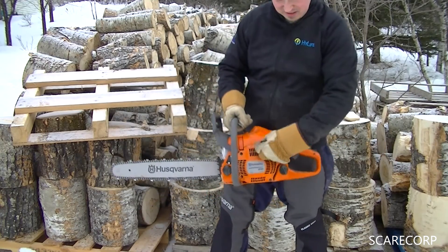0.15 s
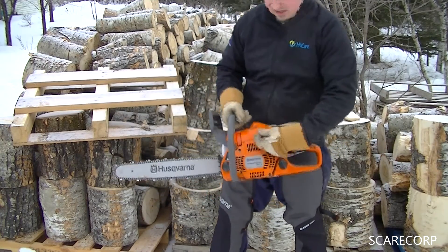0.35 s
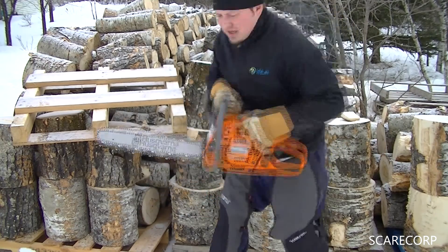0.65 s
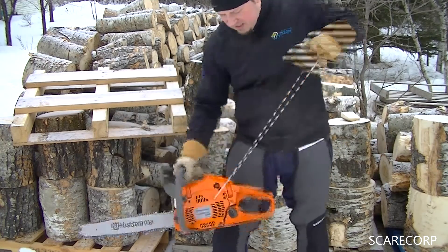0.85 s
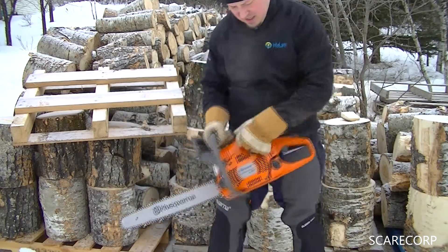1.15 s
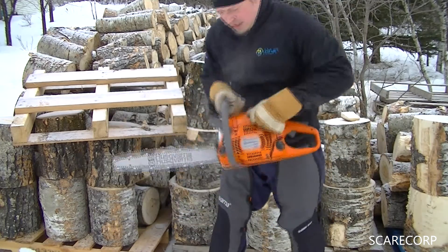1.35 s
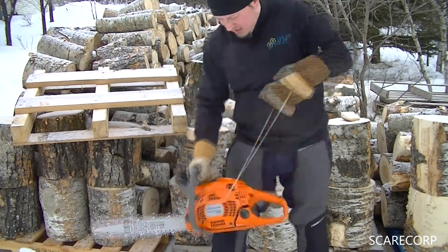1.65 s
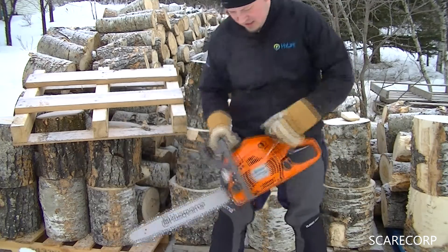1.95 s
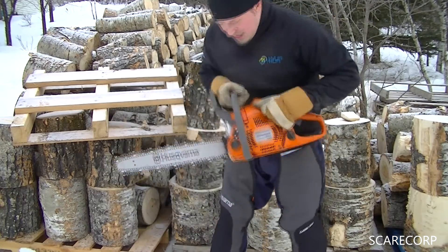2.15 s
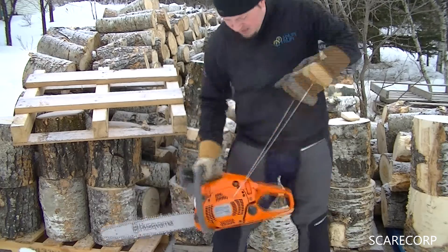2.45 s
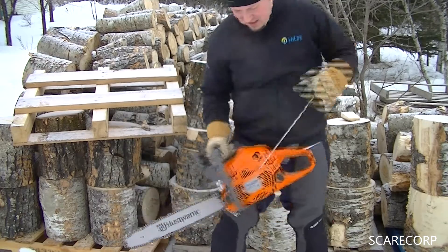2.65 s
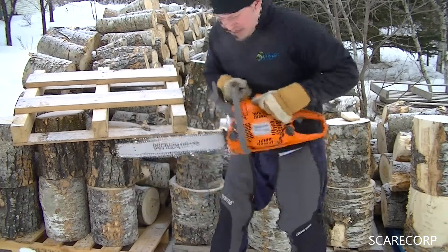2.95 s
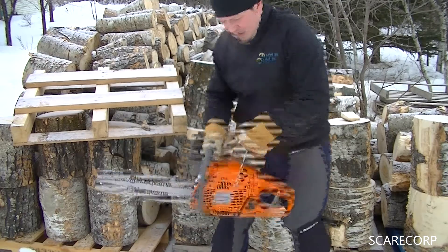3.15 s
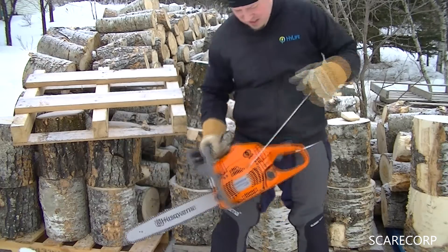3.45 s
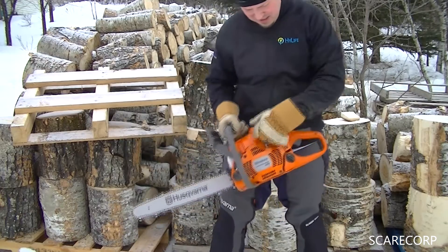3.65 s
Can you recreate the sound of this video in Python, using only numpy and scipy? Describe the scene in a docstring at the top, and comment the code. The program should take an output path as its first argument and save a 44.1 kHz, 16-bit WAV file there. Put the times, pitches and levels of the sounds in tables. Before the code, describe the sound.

Chainsaw pull-starter yanked four times outdoors, engine chuffing over briefly but never firing

```python
"""Outdoors by a woodpile, a cold two-stroke chainsaw is pulled over four times by its rope starter and never fires.
Each pull: a sleeve of filtered friction swishes, the pawls catch with a clack of noise and short rings,
the rope rasps out and the piston chuffs in gliding sine pulses, speeding up and then coasting.
The housing knocks and rattles in short resonances; the rope winds back over ticking pawls that ring the steel,
and the handle bumps the case. Short echoes and a soft filtered-noise rush lie behind."""
import sys
import numpy as np
from scipy import signal
from scipy.fft import rfft, irfft
from scipy.io import wavfile

SR = 44100
rng = np.random.default_rng(int(sys.argv[2]) if len(sys.argv) > 2 else 0)


def digitize_waveform(pressure):
    """Quantize a signal to 16-bit integers and store it at the path in sys.argv[1].

    Rows of a 2-D input are taken as channels; values are limited to [-1, 1].
    """
    field = np.atleast_2d(pressure).T
    bounded = np.clip(field, -1, 1)
    quanta = np.round(bounded * 32767).astype(np.int16)
    wavfile.write(sys.argv[1], SR, quanta)


N = 167580
TIME = np.arange(N) / SR


def crank(first, out, start_rps, top_rps, coast_s):
    """Crankshaft speed and turns since the first chuff: driven up by the rope, then coasting down."""
    driven = np.interp(TIME, [first, out], [start_rps, top_rps])
    speed = driven * np.exp(-np.maximum(TIME - out, 0) / coast_s)
    turns = np.cumsum(speed) / SR
    return speed, turns - np.interp(first, TIME, turns)


CHUFF_GLIDE, CHUFF_SHAPE = 1.77, 3.75  # pitch glide in times to peak; exponent that narrows the swell
CHUFF_SCATTER = 0.015  # random share of pitch


def chuff(partial, length):
    """A gulp of air through the port: a quick swell whose pitch rises as it dies."""
    start_hz, end_hz, peak_s, db = partial
    t = np.arange(SR // 20) / SR
    u = t / (peak_s * length)
    glide = end_hz + (start_hz - end_hz) * np.exp(-u / CHUFF_GLIDE)
    hz = glide * (1 + CHUFF_SCATTER * rng.standard_normal())
    swell = (u * np.exp(1 - u)) ** CHUFF_SHAPE
    return amp(db) * swell * np.sin(2 * np.pi * (np.cumsum(hz) / SR + rng.random()))


# Rope pulls: (first chuff [s], rope fully out [s], speed at first chuff [rev/s], top speed [rev/s],
# coasting time constant [s], end of chuffing [s])
PULLS = [(0.789, 0.8818, 30.3961, 42.7412, 0.1862, 1.073),
         (1.6379, 1.7411, 32.7097, 44.7445, 0.1619, 1.961),
         (2.4281, 2.5331, 33.3517, 42.6336, 0.1476, 2.713),
         (3.2078, 3.3149, 36.4212, 44.1964, 0.1609, 3.518)]
# Air resonances of a chuff: (start pitch [Hz], end pitch [Hz], time to peak at CHUFF_RPS [s], level [dB])
CHUFF = [(550, 926, 0.0036, -16.5), (284, 457, 0.0062, -31)]
# Colour of flywheel and housing: (frequency [Hz], spectral density [dB])
WHIRR = [(40, -49), (130, -40), (220, -6.5), (300, -1), (700, -7.5), (1200, 1.5), (1600, 2), (2300, 1.5),
         (2900, -0.5), (3600, -2.5), (4100, -1.5), (4850, -3.5), (6800, -8.5), (8500, -15.5), (11000, -27),
         (15000, -36)]
CHUFF_LEAD_S = 0.00387  # swell begins this early at CHUFF_RPS
CHUFF_RPS, CHUFF_STRETCH = 33.45, 0.632  # chuffs lengthen below this speed [rev/s]; exponent
HALF_TURN_DB, WEAK_BELOW_RPS, WEAK_DB_PER_RPS = -10.5, 22.5, 1.5
WHIRR_DB, WHIRR_SWELL_DB, WHIRR_LEAD = -31, 1, 0.05  # lead: share of a turn before the chuff


def engine():
    """One hollow chuff per turn and a weaker one between, shorter at speed; flywheel and housing rattle."""
    chuffs, whirr = np.zeros((2, N))
    for first, out, start_rps, top_rps, coast_s, stop in PULLS:
        speed, turns = crank(first, out, start_rps, top_rps, coast_s)
        half_turns = int(2 * np.interp(stop, TIME, turns)) + 1
        for half in range(half_turns):
            s = np.interp(half / 2, turns, TIME)
            rps = np.interp(s, TIME, speed)
            weakening_db = WEAK_DB_PER_RPS * max(WEAK_BELOW_RPS - rps, 0)
            gain = amp(HALF_TURN_DB * (half % 2) - weakening_db)
            length = (CHUFF_RPS / rps) ** CHUFF_STRETCH
            for partial in CHUFF:
                add(chuffs, s - CHUFF_LEAD_S * length, gain * chuff(partial, length))
        running = np.interp(TIME, [first - .02, first, stop - .02, stop + 0.0066], [0, 1, 1, 0])
        whirr += running * amp(WHIRR_SWELL_DB * np.cos(2 * np.pi * (turns + WHIRR_LEAD)))
    rattling = whirr * rattle(per_s=700, spread_db=5, hiss=1.0)
    return chuffs + amp(WHIRR_DB) * colour(rattling, WHIRR)


# Pawls catching, also the start of each rope rasp: (time [s], level [dB])
CATCHES = [(0.7499, -17), (1.5914, -14), (2.3846, -13.5), (3.1629, -12.5)]
# Rope running out after each catch: (end time [s], level [dB])
ROPES = [(0.905, -26), (1.744, -24), (2.532, -24), (3.299, -25.5)]
# Colour of the rasp: (frequency [Hz], spectral density [dB])
RASP = [(40, -33), (130, -51), (280, -22.5), (600, -4), (1000, -10.5), (1350, -9.5), (1650, -4.5),
        (2100, -9.5), (2850, -6.5), (3600, -17.5), (4100, -9.5), (5300, -12.5), (6900, -12.5),
        (7900, -19.5), (8700, -17.5), (10500, -24.5), (12200, -34), (15500, -44)]
ROPE_START_DB, ROPE_FULL = -7.5, 0.83  # level at the catch; share of the rasp's time until full level
RELEASE_S = 0.0031  # fade after the end


def rope():
    """Once the pawls have caught, the cord rasps through its guide and shakes the starter, growing louder."""
    level = np.zeros(N)
    for (start, _), (end, db) in zip(CATCHES, ROPES):
        progress = (TIME - start) / (end - start)
        effort = amp(db + ROPE_START_DB * np.clip(1 - progress / ROPE_FULL, 0, 1))
        level += effort * (TIME > start) * np.exp(-np.maximum(TIME - end, 0) / RELEASE_S)
    return colour(level * rattle(per_s=800, spread_db=3.5, hiss=1.24), RASP)


# Starter spring zinging at full stretch: (start time [s], fall time [s], level [dB])
ZINGS = [(0.88, 0.025, -27), (1.727, 0.025, -25.5), (2.514, 0.016, -22), (3.297, 0.018, -25)]
# Spring resonances: (frequency [Hz], width [Hz], relative level [dB])
SPRING = [(4220, 230, -4.5), (7600, 290, 3.5), (8640, 280, 5.5), (9300, 250, 3.5)]


def spring():
    """A short shrill zing as the rope reaches its end: narrow noise bands at the spring's resonances."""
    level = np.zeros(N)
    for s, fall_s, db in ZINGS:
        attack = np.clip((TIME - s) / 0.0032, 0, 1)
        level += amp(db) * attack * np.exp(-(np.maximum(TIME - s, 0) / fall_s) ** 2)
    out = np.zeros(N)
    for hz, width, db in SPRING:
        phase = 2 * np.pi * hz * TIME
        out += amp(db) * (wander(width) * np.cos(phase) + wander(width) * np.sin(phase))
    return level * unit(out)


# Rope winding back: (start time [s], fastest time [s], start of fade [s], level [dB])
# The last whir fades before it starts, leaving its ticks in front.
REWINDS = [(0.966, 1.125, 1.15, -23.5), (1.954, 1.992, 2.027, -28), (2.653, 2.746, 2.798, -25),
           (3.413, 3.58, 3.34, -22.5)]
# Pawls ticking during the rewind: (time [s], level [dB])
TICKS = [(1.079, -29), (1.0907, -16), (1.101, -19), (1.111, -24), (1.133, -18.5), (1.145, -20), (1.16, -18),
         (1.9733, -20.5), (1.992, -20), (2.007, -20), (2.025, -21), (2.0483, -22), (2.7179, -19.5),
         (2.7326, -16), (2.752, -20.5), (2.761, -17.5), (2.775, -18), (2.7883, -19), (3.519, -26),
         (3.525, -20), (3.5374, -17.5), (3.5484, -14.5), (3.5603, -14.5), (3.5747, -16.5), (3.5859, -18),
         (3.602, -19)]
# Pulley stopping at the end of the rewind: (time [s], level [dB])
STOPS = [(1.2126, -20), (2.096, -30.5), (2.822, -26.5), (3.6342, -19.5)]
# Steel of the starter: (frequency [Hz], level relative to the blow [dB], time to fall 60 dB [s])
STEEL = [(4170, -11, 0.085), (5340, -13, .05), (7080, -10, 0.06), (7420, -13, 0.075), (8500, -25, 0.2),
         (9100, -25, .08), (10110, -20, 0.05), (13050, -27, .08)]
# Colour of the plastic case, shared with the knocks and bumps: (frequency [Hz], spectral density [dB])
CASE = [(40, -52), (130, -32.5), (400, -8), (1000, 0), (1650, 4), (2200, 0), (2900, 2), (3600, -2.5),
        (4150, 1.5), (5000, 2.5), (6500, -2.5), (8000, -11.5), (10500, -17.5), (12500, -34.5), (15500, -46)]
STEEL_SCATTER = 0.00416  # random share of pitch
REWIND_START_DB = -16


def rewind():
    """The pulley whirs back while the pawls tick, then stops with a clack; both set the steel ringing."""
    level, ticks, ring = np.zeros((3, N))
    for start, fastest, end, db in REWINDS:
        swell = amp(db + np.interp(TIME, [start, fastest, end], [REWIND_START_DB, 0, -5]))
        attack = np.clip((TIME - start) / 0.0027, 0, 1)
        level += swell * attack * np.exp(-np.maximum(TIME - end, 0) / 0.013)
    for s, db in TICKS:
        add(ticks, s, amp(db) * impact(fall_s=0.0041, tail_db=-20.5, tail_s=0.021, snap=3.3))
    for s, db in STOPS:
        add(ticks, s, amp(db) * impact(fall_s=0.0051, tail_db=-31, tail_s=0.012, snap=2.9))
    t = np.arange(SR // 4) / SR
    for s, db in TICKS + STOPS:
        for hz, mode_db, t60 in STEEL:
            pitch = hz * (1 + STEEL_SCATTER * rng.standard_normal())
            strength = 2 * rng.random() - 1
            decay = amp(db + mode_db - 60 * t / t60)
            add(ring, s, decay * strength * np.sin(2 * np.pi * pitch * t))
    whir = level * rattle(per_s=540, spread_db=3, hiss=1.0)
    return colour(ticks + whir, CASE) + ring


# Starter and housing knocking under the jerks of compression: (time [s], level [dB])
KNOCKS = [(0.7633, -35), (0.778, -38), (.801, -22), (.835, -13.5), (.856, -22), (0.9826, -20),
          (1.023, -18.5), (1.032, -16), (1.6123, -29), (1.7851, -16.5), (1.8167, -19.5), (1.859, -12.5),
          (1.91, -17), (1.926, -24.5), (2.4174, -18), (2.465, -20), (2.502, -20), (2.533, -22),
          (2.582, -21.5), (2.6173, -22.5), (2.655, -23), (2.669, -19), (3.2, -18.5), (3.2982, -14),
          (3.352, -20), (3.422, -21.5), (3.427, -18.5), (3.486, -20.5)]
# Handle and gloves bumping the case: (time [s], level [dB], brightness [dB per octave])
BUMPS = [(0.0328, -39, 1), (0.2908, -47.5, 3), (0.323, -49.5, 3.5), (0.454, -41, 1.5), (1.186, -25, -4),
         (1.271, -46, 6), (1.453, -43, -6), (2.114, -30.5, -4.5), (2.254, -44.5, 1), (2.8964, -19.5, -3.5),
         (3.716, -28, -6)]
# Colour of the catching pawls: (frequency [Hz], spectral density [dB])
CLACK = [(40, -18), (200, -18), (550, -9.5), (1000, -1), (1500, 3.5), (2100, 0.5), (2800, 2), (3600, -4.5),
         (4200, -3.5), (5500, -1), (7200, -6), (9000, -12), (12000, -25), (16000, -27)]


def blows():
    """Pawls catching, the housing knocking and the handle landing on the plastic case."""
    clacks, knocks, bumps = np.zeros((3, N))
    for s, db in CATCHES:
        add(clacks, s, amp(db) * impact(fall_s=0.0038, tail_db=-13, tail_s=0.0085, snap=3))
    for s, db in KNOCKS:
        add(knocks, s, amp(db) * impact(fall_s=0.0031, tail_db=-18, tail_s=0.018, snap=1.1))
    for s, db, bright_db in BUMPS:
        bump = impact(fall_s=0.0039, tail_db=-19, tail_s=0.0041, snap=0.84)
        add(bumps, s, amp(db) * colour(bump, CASE, bright_db))
    return colour(clacks, CLACK) + colour(knocks, CASE) + bumps


# Sleeve swishes: (middle time [s], half width [s], level [dB])
SWISHES = [(.38, 0.05, -57.5), (0.673, 0.1, -49), (1.525, 0.062, -50.5), (2.311, 0.11, -50.5),
           (3.1, 0.061, -50)]
# Colour of the jacket: (frequency [Hz], spectral density [dB])
CLOTH = [(300, -23.5), (1500, 7.5), (3000, 2), (5200, 3), (7000, -0.5), (8500, -10), (12000, -19),
         (16000, -34)]


def sleeve():
    """The jacket rustles in uneven folds as the saw is lifted for the next pull."""
    level = sum(amp(db) * np.exp(-((TIME - s) / width) ** 2) for s, width, db in SWISHES)
    folds = amp(1.7 * wander(rate_hz=35))
    return colour(level * folds * grit(per_s=780, spread_db=4, hiss=1.1), CLOTH)


# Distant outdoor rush: (time [s], level [dB])
AIR_DB = [(0, -50), (.5, -51), (1.3, -48), (1.5, -50), (2.3, -47.5), (2.9, -41), (3.1, -44), (3.8, -44)]
# Colour of the rush: (frequency [Hz], spectral density [dB])
AIR = [(30, -64), (100, -57.5), (311, -14.5), (384, -20), (486, -5), (950, -4.5), (1130, -8.5), (1500, -12),
       (2000, -18), (2900, -27.5), (5310, -29.5), (8500, -37.5), (16000, -53)]


def air():
    """A soft, distant outdoor rush: coloured noise with a slight flutter in level."""
    flutter_db = wander(rate_hz=18)
    level_db = np.interp(TIME, *np.transpose(AIR_DB))
    return amp(level_db + flutter_db) * colour(rng.standard_normal(N), AIR)


YARD_DB, YARD_T60_S, SIDE_DB = -16, 0.29, -58  # side: level of the side echoes relative to the middle


def yard(x):
    """Short scattered echoes from the logs and the snow."""
    t = np.arange(SR // 2) / SR
    scattered = rng.standard_normal(len(t)) * (rng.random(len(t)) < .06)
    taps = scattered * (t > .005) * amp(-60 * t / YARD_T60_S)
    taps = signal.lfilter(*signal.butter(1, 5000, fs=SR), taps / np.linalg.norm(taps))
    return signal.oaconvolve(x, taps)[:N]


CASE_RING_S, CASE_SCATTER = 0.0045, 0.026  # decay time constant; random share of pitch


def case_mode(hz, size):
    """One short ring of the housing; its pitch depends on where it is struck."""
    t = np.arange(size) / SR
    pitch = hz * (1 + CASE_SCATTER * rng.standard_normal())
    return np.sin(2 * np.pi * pitch * t) * np.exp(-t / CASE_RING_S)


# Modes of the housing, for both impacts and rattle: (frequency [Hz])
CASE_HZ = [1043, 1538, 1742, 2658, 2965, 4115, 5170, 6700]
CASE_RING_DB, RATTLE_DB = -10.5, -7


def impact(fall_s, tail_db, tail_s, snap):
    """A snap, a quick clatter of loose parts and a weaker tail; the housing rings, differently each time."""
    t = np.arange(SR // 8) / SR
    decay = np.exp(-t / fall_s) + amp(tail_db) * np.exp(-t / tail_s)
    burst = rng.choice([-1., 1.], len(t)) * decay
    burst[SR // 4000] += snap
    ring = sum((2 * rng.random() - 1) * case_mode(hz, size=len(t)) for hz in CASE_HZ)
    return burst + amp(CASE_RING_DB) * ring


def rattle(per_s, spread_db, hiss):
    """Loose parts tap the housing at several spots, each ringing one of its modes, over a crackly friction."""
    taps = np.zeros(N)
    for hz in CASE_HZ + CASE_HZ:  # two spots per mode
        hits = rng.random(N) < per_s / (2 * len(CASE_HZ)) / SR
        strength = amp(spread_db * (2 * rng.random(N) - 1))
        taps += signal.oaconvolve(hits * strength, case_mode(hz, size=1500))[:N]
    crackle = grit(per_s=450, spread_db=1.5, hiss=0.45)
    return unit(hiss * crackle + amp(RATTLE_DB) * unit(taps))


def grit(per_s, spread_db, hiss):
    """Friction: tiny slips of uneven size over a smooth hiss."""
    size = amp(spread_db * np.minimum(rng.exponential(1, N), 3))
    slips = (rng.random(N) < per_s / SR) * rng.choice([-1, 1], N) * size
    return unit(unit(slips) + hiss * rng.standard_normal(N))


def wander(rate_hz):
    """Random curve of rms 1, limited to roughly the given rate."""
    hz = np.fft.rfftfreq(N, 1 / SR)
    return unit(irfft(rfft(rng.standard_normal(N)) * np.exp(-(hz / rate_hz) ** 2), N))


def colour(x, points, tilt_db=0):
    """Causal filter of unit energy with the given spectrum, tilted per octave above about 1 kHz."""
    size = 4096
    octave = np.log2(abs(np.fft.fftfreq(size, 1 / SR)) + 1)
    hz, db = np.transpose(points)
    gain_db = np.interp(octave, np.log2(hz), db) + tilt_db * np.maximum(octave, 10)
    # The Hilbert transform of the log gain supplies the minimum phase.
    spectrum = np.exp(np.conj(signal.hilbert(np.log(amp(gain_db)))))
    taps = np.fft.ifft(spectrum).real[:size // 2]
    return signal.oaconvolve(x, taps / np.linalg.norm(taps))[:len(x)]


def amp(db):
    """Decibels to gain."""
    return 10 ** (np.asarray(db) / 20)


def unit(x):
    """Scales to rms 1."""
    return x / np.sqrt(np.mean(x ** 2) + 1e-20)


def add(mix, s, sound):
    """Mixes a sound in at a time in seconds."""
    part = mix[max(round(s * SR), 0):][:len(sound)]
    part += sound[:len(part)]


def scene():
    """The saw is straight ahead; echoes and microphone ports add a little width."""
    saw = engine() + rope() + spring() + rewind() + blows() + sleeve()
    mid = saw + amp(YARD_DB) * yard(saw) + air()
    side = amp(YARD_DB + SIDE_DB) * yard(saw) + amp(-22.0) * air()
    side += amp(-89) * colour(rng.standard_normal(N), [(60, 2), (4000, -21)])  # microphone self-noise
    side += amp(-25.0) * np.diff(mid, prepend=0)  # the two ports differ slightly in the treble
    return np.array([mid + side, mid - side]) * amp([[.1], [-.1]])  # left a touch louder


EDGE_HZ = 16000


def record(dry):
    """The loudest snaps round off near full scale; then the low cut and the band limit."""
    out = signal.lfilter(*signal.butter(2, 85, "high", fs=SR), np.tanh(dry))
    lowpass = signal.firwin(401, EDGE_HZ, window=("kaiser", 9), fs=SR)
    return signal.oaconvolve(out, lowpass[None], "same")


dry = scene()
out = record(dry)
digitize_waveform(out)
```